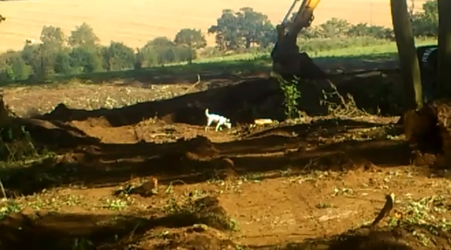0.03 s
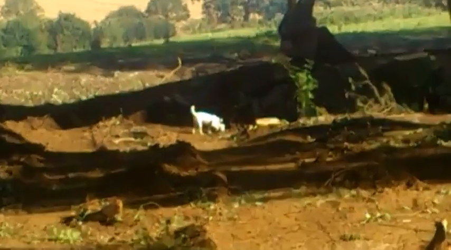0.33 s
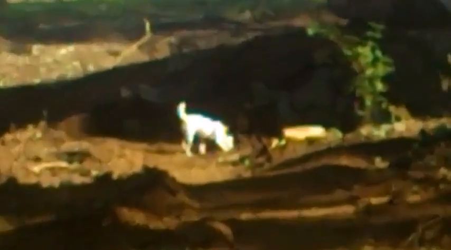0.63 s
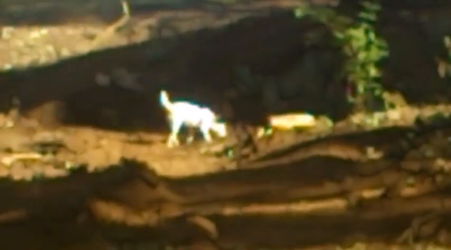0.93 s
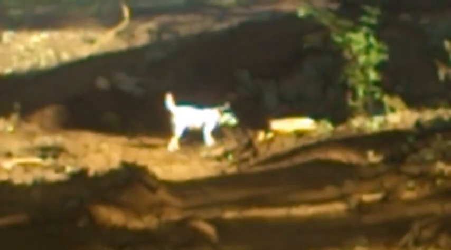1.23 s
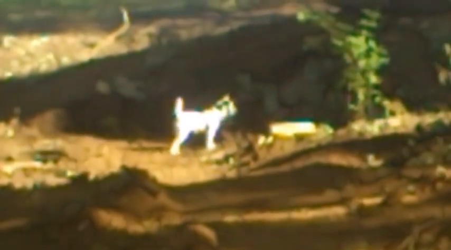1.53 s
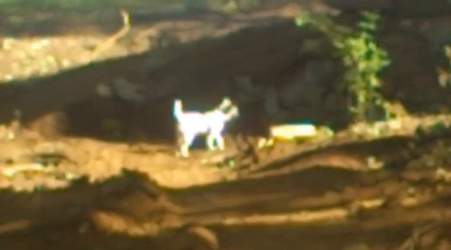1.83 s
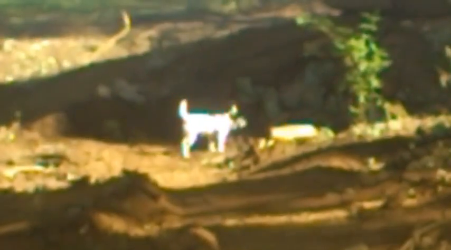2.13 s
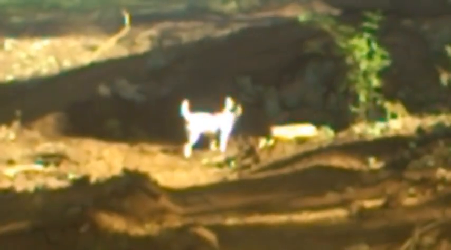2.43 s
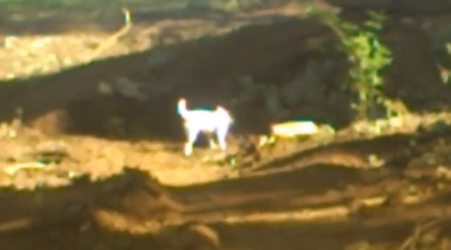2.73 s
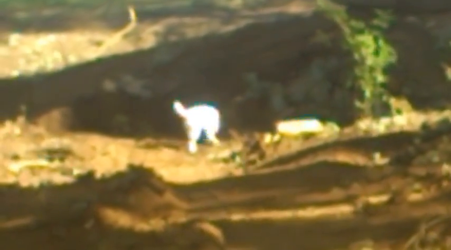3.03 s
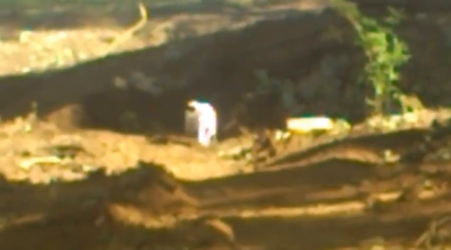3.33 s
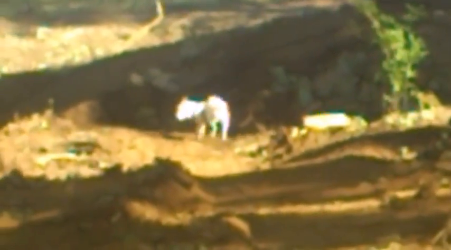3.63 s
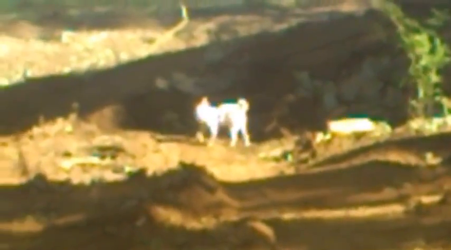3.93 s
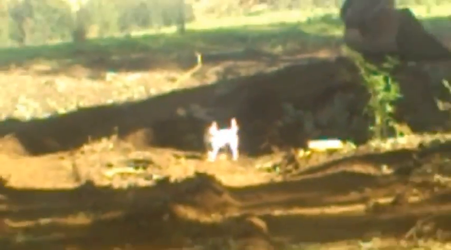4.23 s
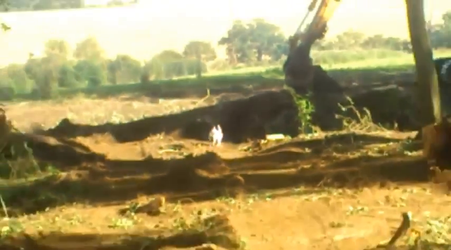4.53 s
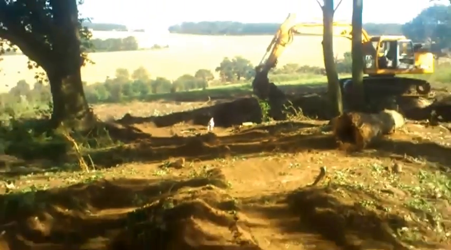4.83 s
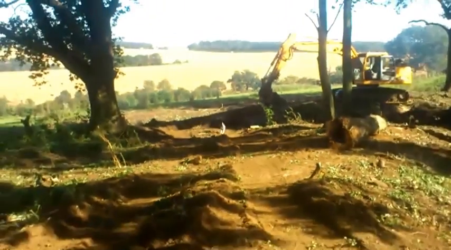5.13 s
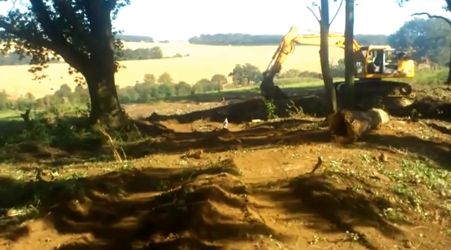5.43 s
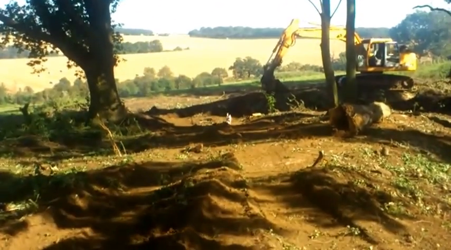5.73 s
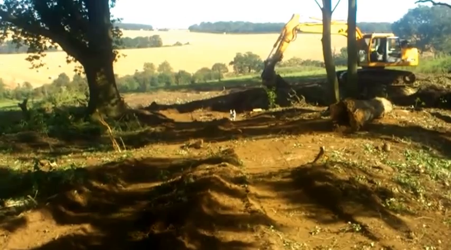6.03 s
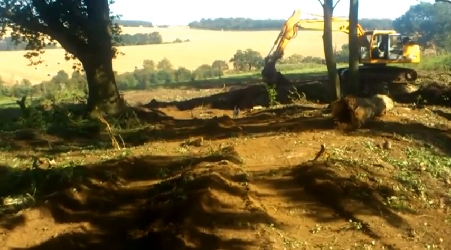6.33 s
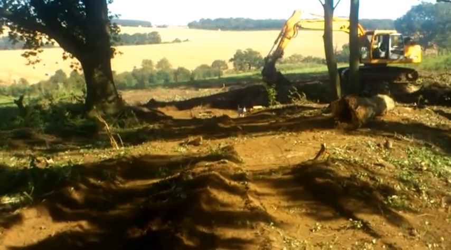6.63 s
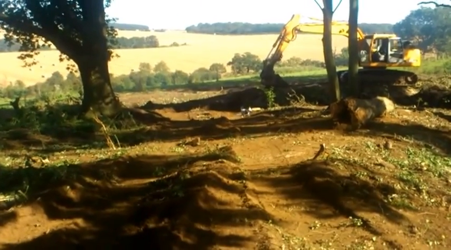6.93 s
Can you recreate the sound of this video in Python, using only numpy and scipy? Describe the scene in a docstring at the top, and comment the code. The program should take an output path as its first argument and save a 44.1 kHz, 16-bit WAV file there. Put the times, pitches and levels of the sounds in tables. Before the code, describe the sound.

Leaves hiss softly in a quiet clearing while a distant excavator drones faintly and small birds chirp. About three seconds in, someone close to the microphone makes a loud, wet double kissing squeak, as if calling a dog. Sharp plastic handling clicks come now and then, mostly on the left, the loudest just after the kisses. Low puffs of wind nudge the microphone, growing stronger toward the end.

```python
"""Leaves hiss and a far machine drones in a quiet clearing, while a breeze nudges the microphone.
Small birds chirp, whistle and warble in the trees. The camera's plastic case slips in the hand
and clicks, right beside the left microphone port (the opening that lets sound in).
About three seconds in comes the main sound, a close double kissing squeak, as if calling a dog:
air sucked through pursed, wet lips makes them slap shut so fast that they buzz and squeal."""
import sys
import numpy as np
from scipy import signal
from scipy.fft import rfft, irfft
from scipy.io import wavfile
from scipy.ndimage import uniform_filter1d

SR = 44100
rng = np.random.default_rng(int(sys.argv[2]) if len(sys.argv) > 2 else 0)


def waveform_to_disk(signal):
    """Save audio, clipped to [-1, 1], as 16-bit WAV at the path in sys.argv[1]."""
    frames = np.transpose(np.atleast_2d(signal))
    scaled = np.clip(frames, -1, 1) * 32767
    samples = np.round(scaled).astype(np.int16)
    wavfile.write(sys.argv[1], SR, samples)


N = 307377
TIME = np.arange(N) / SR


def gain_of(db):
    """Turns decibels into a factor to multiply by."""
    return 10 ** (np.asarray(db) / 20)


def evened(x):
    """Scales a signal to an average (rms) size of 1."""
    return x / np.sqrt(np.mean(x ** 2) + 1e-20)


def at_hz(rows, hz, column=1):
    """Looks up one column of a table at the frequencies hz, on a log scale."""
    table = np.array(rows, float)
    return np.interp(np.log(hz + 1), np.log(table[:, 0] + 1), table[:, column])


def at_time(rows, t):
    """Looks up a table's value at the times t."""
    return np.interp(t, *np.transpose(rows))


def add(mix, s, sound):
    """Mixes a stereo sound in at time s."""
    part = mix[:, round(s * SR):][:, :sound.shape[-1]]
    part += sound[..., :part.shape[1]]


def wander(n, hz):
    """A smooth random curve that wiggles up to about hz times a second."""
    f = np.fft.rfftfreq(n, 1 / SR)
    return evened(irfft(rfft(rng.standard_normal(n)) / (1 + (f / hz) ** 4), n))


def shortest_pulse(gain):
    """The quickest pulse that has the given strength at each frequency."""
    cepstrum = irfft(np.log(np.maximum(gain, 1e-5)))
    half = len(cepstrum) // 2
    fold = np.r_[1, np.full(half - 1, 2), 1, np.zeros(half - 1)]
    return irfft(np.exp(rfft(cepstrum * fold)))


def ring(hz, width_hz):
    """A band of noise around the pitch hz: the narrower, the more like a tone."""
    turn = 2 * np.pi * np.cumsum(hz * np.ones(N)) / SR
    return evened(wander(N, width_hz / 2) * np.cos(turn) + wander(N, width_hz / 2) * np.sin(turn))


def trees(x, fade_s):
    """Echoes off trunks and leaves, different at each port, dying by 60 dB in fade_s."""
    t = np.arange(SR) / SR
    tail = rng.standard_normal((2, SR)) * gain_of(-60 * t / fade_s) * (1 - np.exp(-t / 0.029))
    return signal.fftconvolve(x, tail / np.linalg.norm(tail[0]), axes=1)[:, :N]


def scatter(share, decay_s, size=512):
    """A pulse trailed by tiny echoes that smear it in time but keep its overall tone."""
    lag = np.arange(size) / SR
    echoes = rng.standard_normal(size) * np.exp(-lag / decay_s)
    pulse = (lag == 0) + share * echoes / np.linalg.norm(echoes)
    spectrum = rfft(np.r_[np.zeros(size // 8), pulse], 2 * size)
    colour = np.sqrt(uniform_filter1d(abs(spectrum) ** 2, size=size // 16))
    return irfft(spectrum / colour)[size // 8 - 16:][:size]


# Tone of the air and leaves, from low to high (f/Hz, relative level/dB)
AIR_COLOUR = [(15, -9), (25, 0.5), (70, -0.5), (105, -12.5), (200, -17), (350, -14), (520, -22),
              (900, -23.5), (1500, -27.5), (2400, -31), (6500, -32), (9500, -34), (11500, -37.5),
              (15500, -40)]
# How alike the air sounds at the two ports (f/Hz, likeness: 1 means the same)
AIR_LIKENESS = [(40, 0.17), (130, 1), (300, 0.52), (640, 0.7), (1400, -0.0951), (15000, 0)]
# How much louder the left side is (f/Hz, left minus right level/dB)
LEFT_LEAN = [(60, -0.5), (300, -1.5), (2400, -1), (4400, -4), (6000, -1), (8800, 8), (12000, 0.5)]
# Stirring leaves lift the hiss (t/s, treble boost/dB)
LEAF_STIR = [(0, 3), (2.7, 2.5), (3.7, 4.5), (4.6, 2), (5.4, 4), (6.1, 1.5), (6.97, 6)]


def air(level_db=-52.77, patchy_db=1.5, size=1024):
    """The air rumbles softly under a hiss of leaves that drifts in patches."""
    hop, hz = size // 4, np.fft.rfftfreq(size, 1 / SR)
    frames = N // hop + 5
    a, b, c, d, patches = rng.standard_normal((5, len(hz), frames))
    patches = evened(uniform_filter1d(uniform_filter1d(patches, size=16, axis=0), size=20, axis=1))
    alike = at_hz(AIR_LIKENESS, hz)[:, None]
    left = a + 1j * b
    right = alike * left + np.sqrt(1 - alike ** 2) * (c + 1j * d)
    stir_db = np.outer(hz / (hz + 700), at_time(LEAF_STIR, np.arange(frames) * hop / SR))
    lean_db = np.array([1, -1])[:, None, None] * at_hz(LEFT_LEAN, hz)[:, None] / 2
    colour = gain_of(at_hz(AIR_COLOUR, hz)[:, None] + patchy_db * patches + stir_db + lean_db)
    noise = signal.istft(np.array([left, right]) * colour, nperseg=size, noverlap=size - hop)[1]
    return gain_of(level_db) * evened(noise[:, :N])


# The machine's speed sets the pitch of its whine (t/s, f/Hz)
WHINE_PITCH = [(0, 391), (.6, 383), (1.05, 367.2), (1.9, 379.8), (2.7, 358.1), (6.97, 360)]
# How hard it works sets the loudness of the whine (t/s, level/dB)
WHINE_LEVEL = [(0, -63), (1.9, -62.5), (3.7, -70.5), (5.7, -69.5), (6.97, -64)]


def machine(throb_db=-62, full_load_db=-63):
    """A far engine: throbbing exhaust, hum, a wavering whine and a dull roar that grows with effort."""
    whine_db = at_time(WHINE_LEVEL, TIME)
    hum_db = np.interp(TIME, [3.2, 4.08], [-76, -66.5])  # the hum swells and stays
    roar_db = -66.5 + 1.6 * (whine_db - full_load_db)
    whine = gain_of(whine_db) * ring(at_time(WHINE_PITCH, TIME), width_hz=56)
    hum = gain_of(hum_db) * ring(277, width_hz=25.5)
    throb = gain_of(throb_db) * ring(74, width_hz=9.9)
    roar = gain_of(roar_db) * np.array([ring(790, width_hz=330) for port in range(2)])
    return whine + hum + throb + roar


# Tone of wind on the microphone, mostly bass (f/Hz, relative level/dB)
WIND_COLOUR = [(15, -13), (35, -1.5), (70, 1.5), (130, -6.5), (200, -17), (350, -29.5), (800, -59),
               (2000, -100)]
# Puffs of wind at the left port (start t/s, length/s, level/dB)
WIND_GUSTS = [(0.033, 0.21, -44.5), (1.011, 0.073, -45.5), (1.312, .22, -48.5), (1.565, 0.052, -32.5),
              (1.645, 0.314, -50), (2.209, .09, -46.5), (2.343, 0.092, -42), (4.08, .1, -50),
              (4.661, .09, -48), (5.21, 0.13, -46), (5.384, 0.082, -31.5), (5.73, .11, -41),
              (5.861, 0.47, -38), (6.59, 0.12, -40), (6.737, 0.1, -39.5), (6.9, 0.072, -36)]


def breeze(calm_db=-63, swell_s=0.043, lumpy_db=3.0, right_db=-14):
    """Swirls of air push on each port separately, mostly on the left, which faces the wind."""
    strength = np.full(N, gain_of(calm_db))
    for s, length, db in WIND_GUSTS:  # each gust swells, holds and dies away
        inside_s = np.minimum(TIME - s, s + length - TIME)
        strength += gain_of(db) * np.clip(inside_s / min(swell_s, length / 2), 0, 1)
    colour = gain_of(at_hz(WIND_COLOUR, np.fft.rfftfreq(N, 1 / SR)))
    swirls = evened(irfft(rfft(rng.standard_normal((2, N))) * colour, N))
    lumps = evened(gain_of(lumpy_db * wander(N, hz=21)))
    return swirls * lumps * strength * gain_of([[0], [right_db]])


def bird_note(length, first_hz, db, fall, waver):
    """A pure tone that slides down and wobbles; fall and waver are shares of its pitch."""
    t = np.arange(0, length, 1 / SR)
    hz = first_hz * (1 - fall * t / length + waver * wander(SR, hz=201)[:len(t)])
    tone = np.sqrt(2) * np.sin(2 * np.pi * np.cumsum(hz) / SR) * signal.windows.tukey(len(t), .4)
    lean_db = at_hz(LEFT_LEAN, first_hz) - 1.2
    return tone * gain_of(db + np.array([[1], [-1]]) * lean_db / 2)


# Short falling chirps (t/s, starting f/Hz, relative level/dB)
BIRD_CHIRPS = [(0.694, 4020, -58), (0.833, 3830, -60), (.893, 4940, -59.5), (0.973, 3910, -60.5),
               (1.1, 4200, -59), (1.219, 4310, -55.5), (1.245, 3770, -63), (1.272, 3410, -59),
               (1.378, 3900, -56.5), (1.49, 4300, -56.5), (1.543, 3500, -62.5), (5.878, 3750, -67),
               (6.123, 4450, -60.5)]
# Nearly steady whistles (t/s, length/s, starting f/Hz, relative level/dB)
BIRD_WHISTLES = [(0.611, .026, 4370, -60), (1.857, 0.052, 3990, -48), (1.945, 0.02, 4040, -60),
                 (2.06, .085, 3844, -58.5), (5.784, 0.024, 3890, -62), (6.035, 0.041, 4080, -58.5)]
# Fast, blurred warbles (t/s, length/s, starting f/Hz, relative level/dB)
BIRD_WARBLES = [(0.749, 0.037, 4650, -60), (1.246, .12, 7550, -65.5), (1.36, .3, 5270, -63),
                (1.639, 0.078, 4510, -55.5), (1.663, 0.26, 4960, -62.5), (1.92, .33, 4700, -62.5),
                (2.076, .14, 7220, -65), (2.24, 0.31, 7200, -68.5), (3.891, 0.054, 1380, -62.5),
                (3.952, 0.046, 1215, -62)]


def birds(direct_db=-6, branches_db=-4.0, wood_db=-3.5):
    """Small birds sing, blurred by echoes from near branches and the wood behind."""
    song = np.zeros((2, N))
    for s, hz, db in BIRD_CHIRPS:
        add(song, s, bird_note(0.0244, hz, db, fall=0.229, waver=0.008))
    for s, length, hz, db in BIRD_WHISTLES:
        add(song, s, bird_note(length, hz, db, fall=0.0078, waver=0.014))
    for s, length, hz, db in BIRD_WARBLES:
        add(song, s, bird_note(length, hz, db, fall=0.03, waver=0.075))
    branches = gain_of(branches_db) * trees(song, fade_s=0.059)
    wood = gain_of(wood_db) * trees(song, fade_s=1.0)
    return gain_of(direct_db) * song + branches + wood


# How widely each ring of the case spreads in pitch (thud width/Hz, knock width/Hz, snap width/Hz)
RING_WIDTHS = [525, 2160, 3030]
# How a click changes on its way through the case to the right port (f/Hz, level change/dB)
THROUGH_CASE = [(200, 3.5), (1000, -6.5), (2200, 5), (4500, 17.5), (8000, -12), (15000, -19)]
# Clicks of the case, with relative levels (t/s, push level/dB, thud f/Hz, thud level/dB,
# knock level/dB, snap f/Hz, snap level/dB, level change at the right port/dB)
CASE_CLICKS = [(0.3186, 6.5, 960, 5, -1, 8100, 4, -20), (0.6665, 5, 725, 9, -6.5, 9700, -6, -21),
               (3.3344, 3.5, 1140, 14, 17, 8200, 18.5, -7.5),
               (3.5540, -11, 720, -1.5, -8.5, 8600, -6, -8.5),
               (4.2055, 8.5, 770, 10.5, 12.5, 7280, 18, -18.5), (4.2436, -7, 900, 8.5, 6.5, 6400, 2, -16.5),
               (5.5116, 4, 700, -2.5, -22, 8300, -13.5, -38)]


def clicks(knock_hz=2030, rattle=0.95, rattle_s=0.001, echo_db=-35, size=2048):
    """Each slip of the plastic rattles and rings for an instant: low thud, middle knock, high snap."""
    out, hz = np.zeros((2, N)), np.fft.rfftfreq(size, 1 / SR) + 1
    for s, push_db, thud_hz, thud_db, knock_db, snap_hz, snap_db, right_db in CASE_CLICKS:
        power = gain_of(push_db) ** 2 / (1 + (hz / 450) ** 4)  # the low push of the finger
        rings = zip((thud_hz, knock_hz, snap_hz), RING_WIDTHS, (thud_db, knock_db, snap_db))
        for (f, width, db), steepness in zip(rings, (1.3, 3, 1.7)):
            off_pitch = (hz ** 2 - f ** 2) / (hz * width)
            power += gain_of(db) ** 2 / (1 + off_pitch ** 2) ** steepness
        left = np.sqrt(power)
        right = left * gain_of(right_db + at_hz(THROUGH_CASE, hz))
        pulses = [shortest_pulse(side)[:size // 4] for side in (left, right)]
        add(out, s - .0005, np.array([np.convolve(scatter(rattle, rattle_s), p) for p in pulses]))
    return out + gain_of(echo_db) * trees(out, fade_s=0.01)


# The two kisses (start t/s, length/s, level/dB, share of the length at which the sucking peaks)
KISS_PULLS = [(3.038, 0.11, -21.5, 0.29), (3.144, 0.13, -17.5, 0.564)]
# Base rate of the lips' flutter: a climb to a held squeal, then a lower rise and fall (t/s, f/Hz)
LIP_FLUTTER = [(3.04, 1651), (3.06, 2247), (3.078, 3060), (3.097, 2930), (3.115, 3220), (3.133, 799),
               (3.15, 597.6), (3.17, 996), (3.21, 1715), (3.245, 1340), (3.275, 900)]


def lips(squeal_hz=2650, neutral_hz=2500, smack_db=-9.5, smack_s=0.017):
    """Suction rises and falls once per kiss, setting level and roughness; slow flutter is brighter."""
    t = np.arange(KISS_PULLS[0][0], KISS_PULLS[-1][0] + KISS_PULLS[-1][1], 1 / SR)
    hz = at_time(LIP_FLUTTER, t)
    suction, level = np.zeros((2, len(t)))
    for s, length, db, peak in KISS_PULLS:
        progress = np.clip((t - s) / length, 0, 1)
        arch = np.sin(np.pi * progress ** (np.log(.5) / np.log(peak)))
        suction += arch
        level += gain_of(db) * arch
    locked = np.clip((hz - squeal_hz) / 201, 0, 1)  # fast flutter locks into a cleaner squeal
    rough = (1 - locked) * (0.37 + 0.094 * suction) + locked * 0.17
    smack = smack_db * np.exp((t[0] - t) / smack_s)  # the lips part with a dull smack
    tilt_db = 2.8 * np.log2(neutral_hz / hz) + smack  # treble boost per octave
    return t, hz, level, rough, tilt_db


def lip_slaps(hz, rough, jitter=.22, uneven=0.51, hiss=0.31):
    """Two patches of lip slap shut over a hiss; the slower one grows when the seal is rough."""
    samples = np.arange(len(hz))
    buzz = hiss * np.sqrt(rough) * rng.standard_normal(len(hz))
    for ratio, share in ((0.97, 0.85), (0.62, 0.83 * rough)):
        turns = np.cumsum(ratio * hz * (1 + jitter * rough * wander(len(hz), hz=1390))) / SR
        slaps = np.interp(np.arange(1, int(turns[-1])), turns, samples)  # one slap per turn
        chance = np.clip(rng.standard_normal(len(slaps)), -1.5, 1.5)
        force = np.exp(uneven * rough[slaps.astype(int)] * chance)
        pulses = force @ np.sinc(samples - slaps[:, None])
        buzz += share * pulses / np.sqrt(ratio * hz / SR)
    return buzz


# Tone of the squeak at each port (f/Hz, relative left level/dB, relative right level/dB)
SQUEAK_COLOUR = [(400, -64, -67), (900, -29, -29), (1400, -18, -21), (2105, -11.5, -15), (3180, -17, -3),
                 (4200, -8, -2.5), (5570, -7.5, 3.5), (6850, -3, -2.5), (7550, -.5, -13.5), (9700, -1, -2),
                 (11800, -5, -12), (13900, -4, -12), (15300, -12, -8), (15900, -10, -25)]


def kiss(smear=1.4, smear_s=0.0015, paths=9, left_lag_samples=6, size=512):
    """Wet lips slap shut hundreds to thousands of times a second: buzz, squeal and rasp."""
    t, hz, level, rough, tilt_db = lips()
    f, frame_s, spectra = signal.stft(lip_slaps(hz, rough), SR, nperseg=size // 4)
    octaves = np.log2(np.maximum(f, 1000) / 6000)
    spectra *= gain_of(np.outer(octaves, np.interp(frame_s + t[0], t, tilt_db)))
    buzz = signal.istft(spectra, SR, nperseg=size // 4)[1][:len(t)]
    # hand and camera scatter the slaps along paths that drift as the lips move
    drift = np.linspace(0, paths - 1, len(t))
    fades = np.maximum(1 - abs(drift - np.arange(paths)[:, None]), 0)
    ports = np.zeros((2, len(t)))
    for port in range(2):
        smeared = sum(np.convolve(buzz * fade, scatter(smear, smear_s)) for fade in fades)
        colour = gain_of(at_hz(SQUEAK_COLOUR, np.fft.rfftfreq(size, 1 / SR), column=port + 1))
        ports[port] = np.convolve(smeared, shortest_pulse(colour))[:len(t)]
    ports[0] = np.roll(ports[0], left_lag_samples)
    ports /= np.sqrt(uniform_filter1d((ports ** 2).mean(0), size=400) + 1e-12)  # even out the loudness
    out = np.zeros((2, N))
    add(out, t[0], ports * level)
    return out + gain_of(-27) * trees(out, fade_s=.19) + gain_of(-36.5) * trees(out, fade_s=0.82)


def scene():
    """All the sounds together at the left and right ports."""
    return air() + machine() + breeze() + birds() + kiss() + clicks()


def record(dry):
    """The loudest clicks overload the input; then the highest treble is cut away."""
    low_pass = signal.firwin(511, cutoff=15900, window=("kaiser", 9), fs=SR)
    return signal.oaconvolve(np.clip(dry, -1, 1), low_pass[None], "same")


dry = scene()
out = record(dry)
waveform_to_disk(out)
```